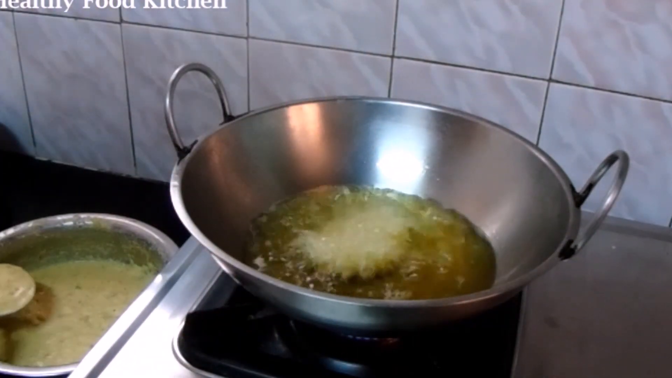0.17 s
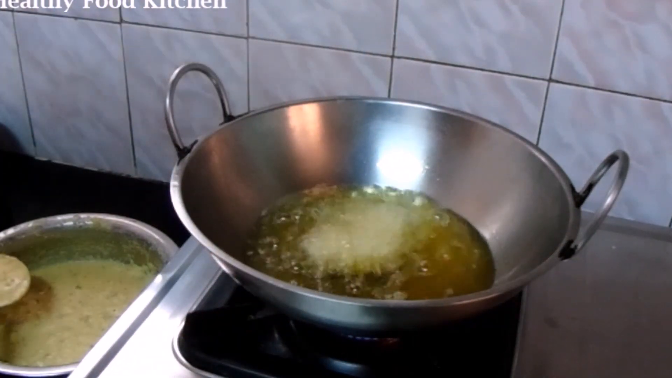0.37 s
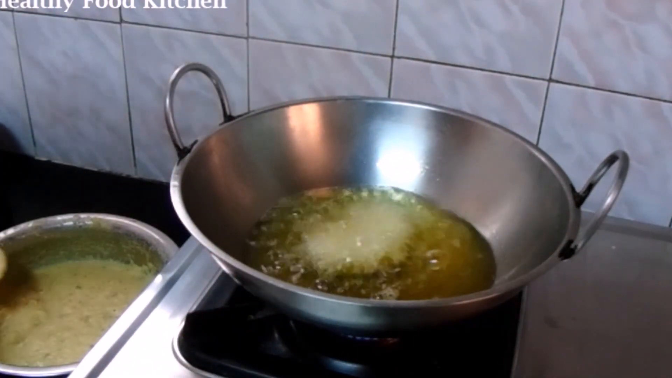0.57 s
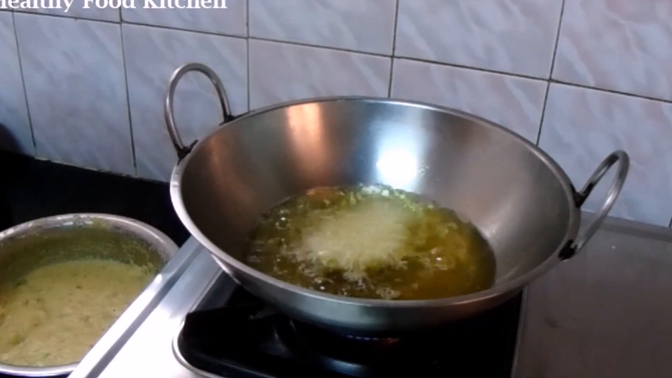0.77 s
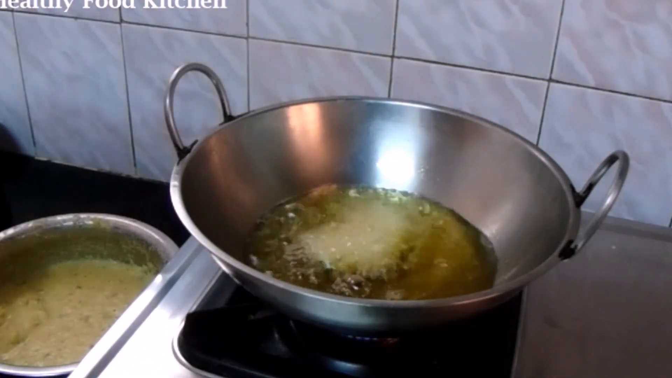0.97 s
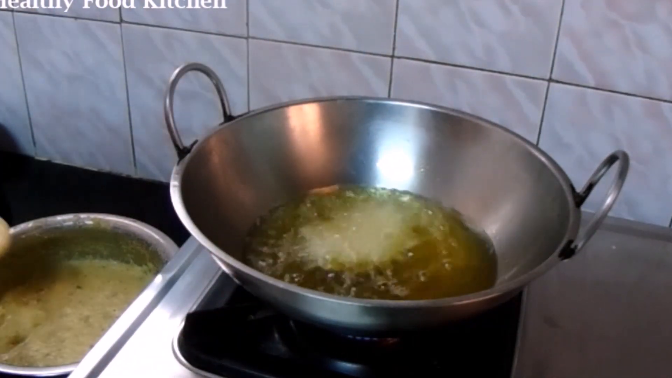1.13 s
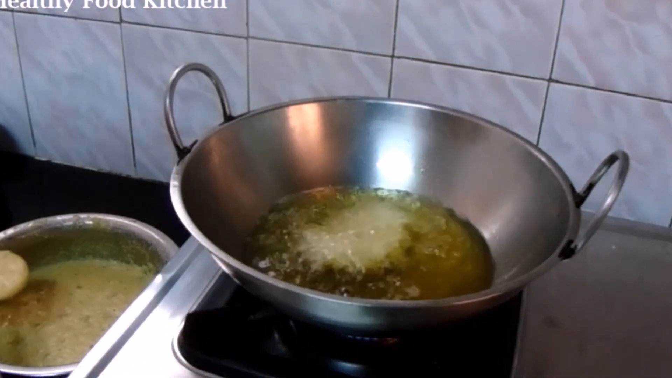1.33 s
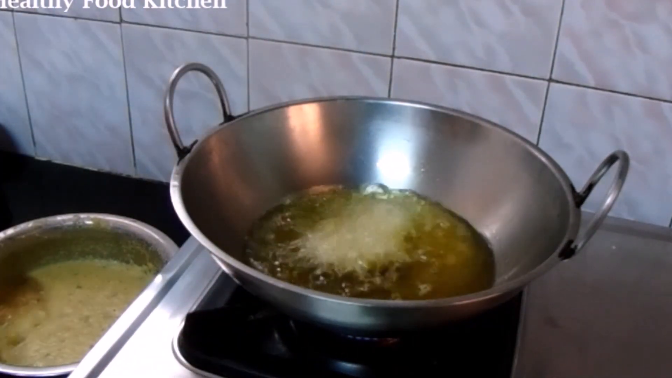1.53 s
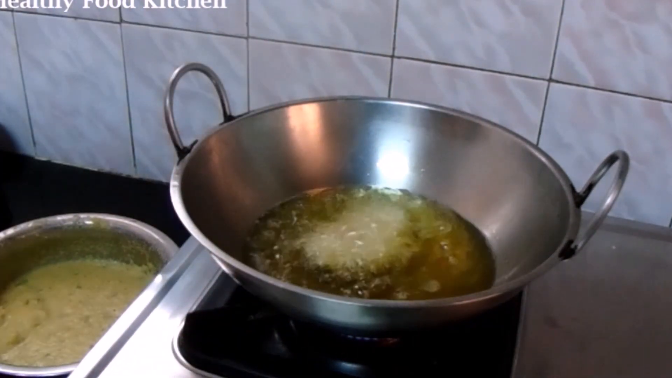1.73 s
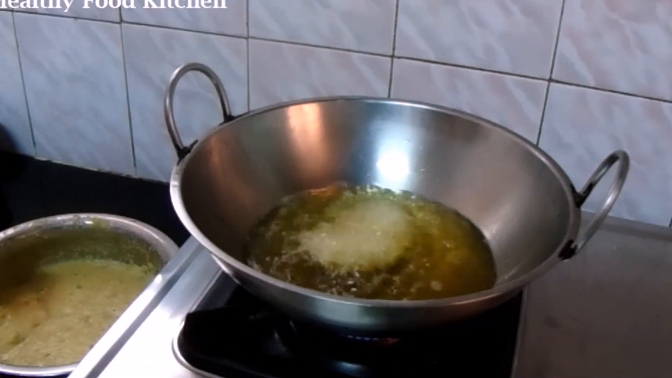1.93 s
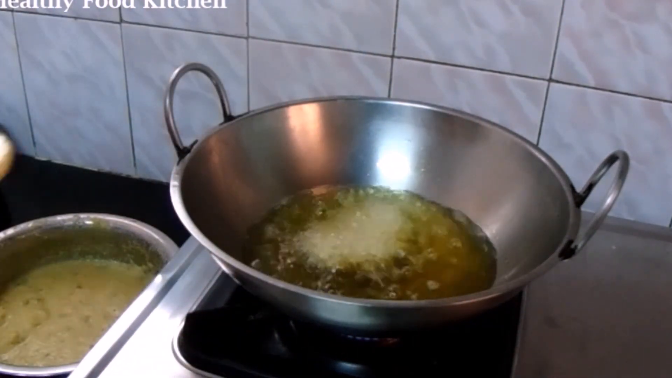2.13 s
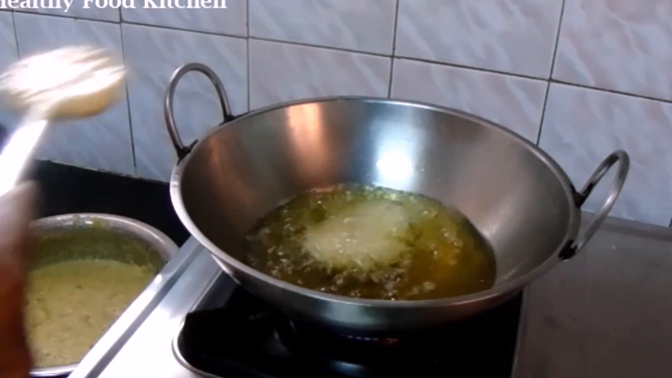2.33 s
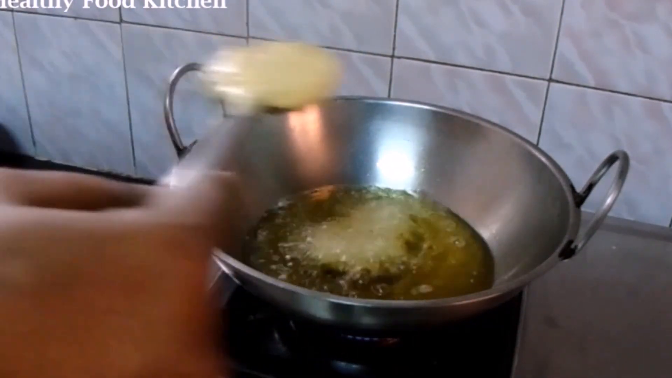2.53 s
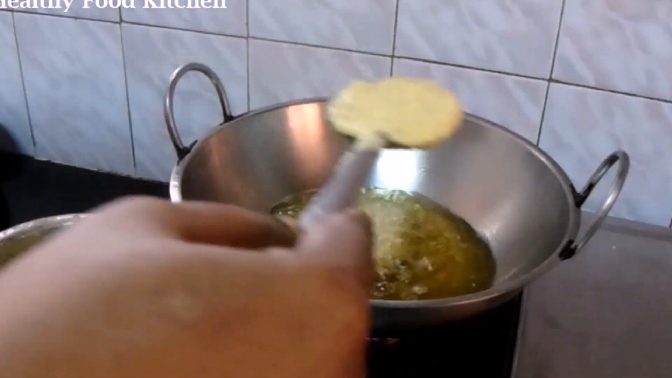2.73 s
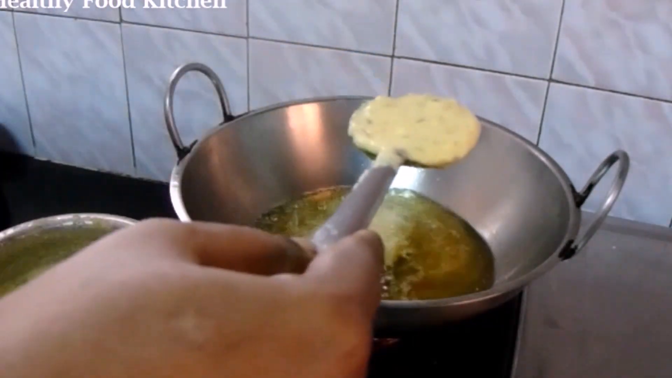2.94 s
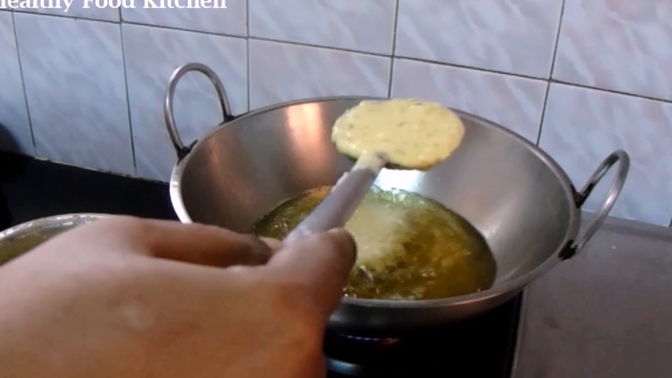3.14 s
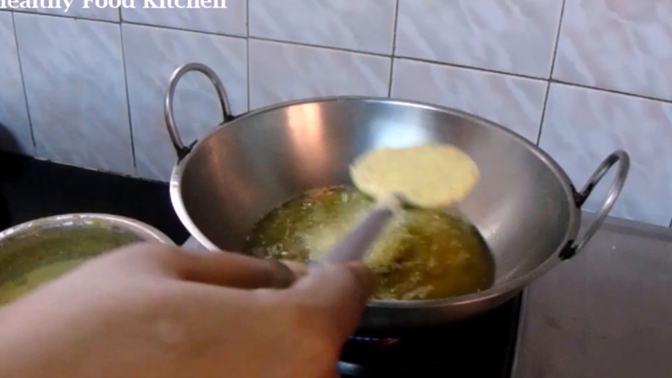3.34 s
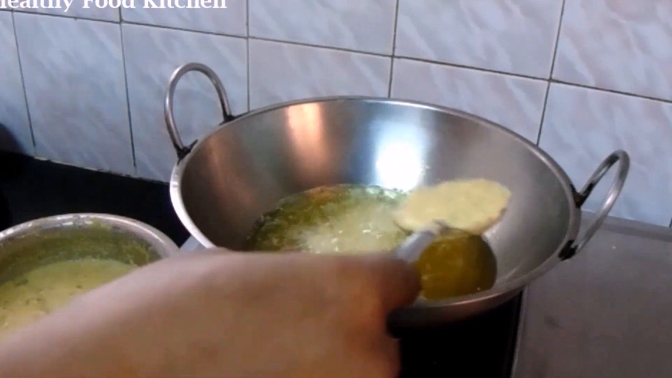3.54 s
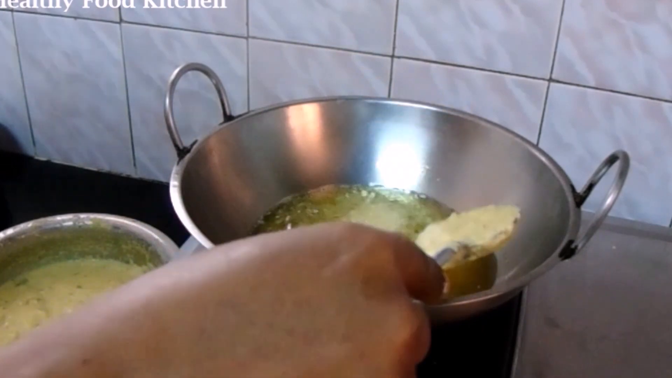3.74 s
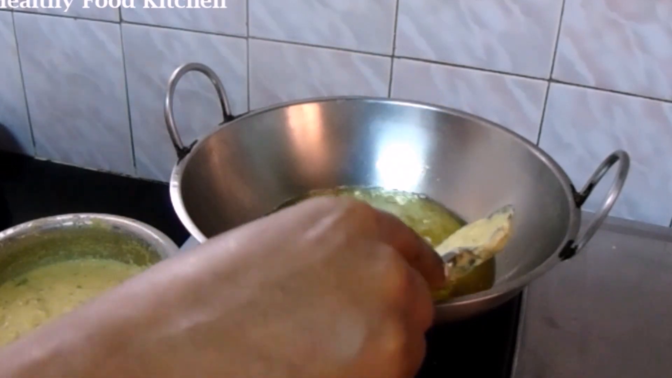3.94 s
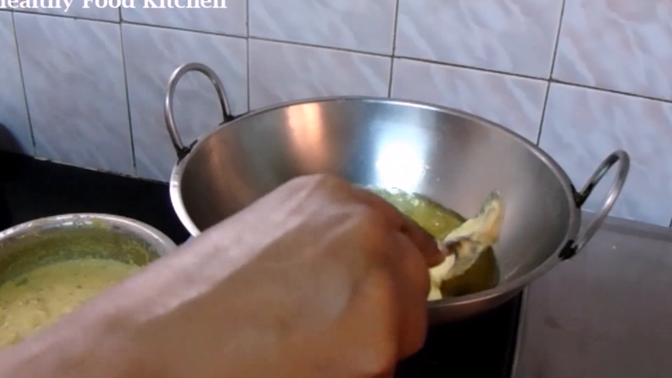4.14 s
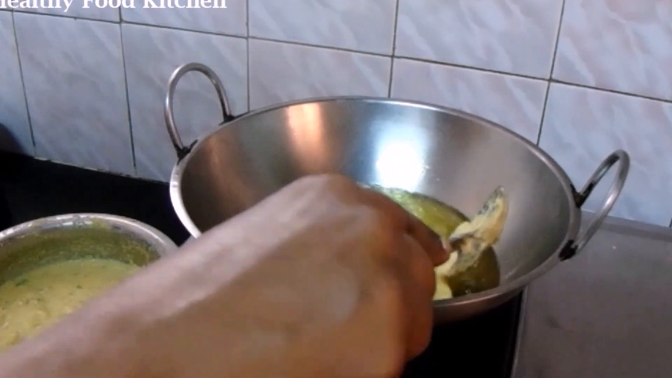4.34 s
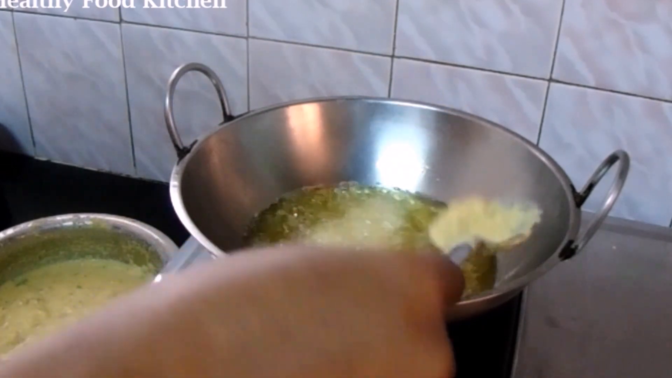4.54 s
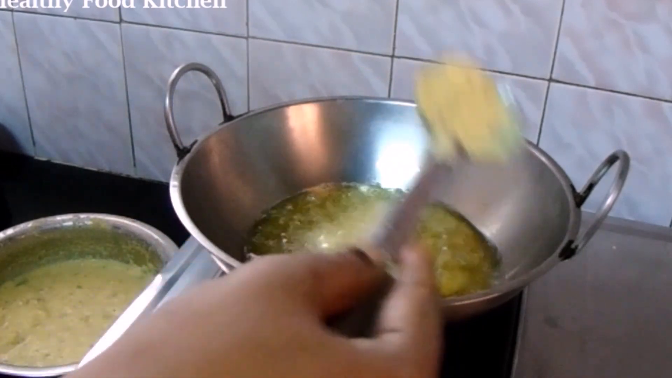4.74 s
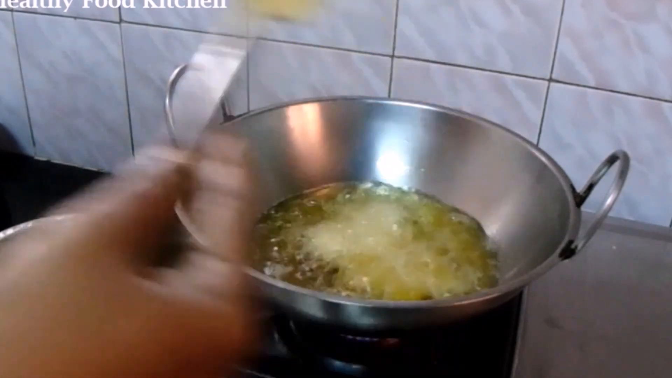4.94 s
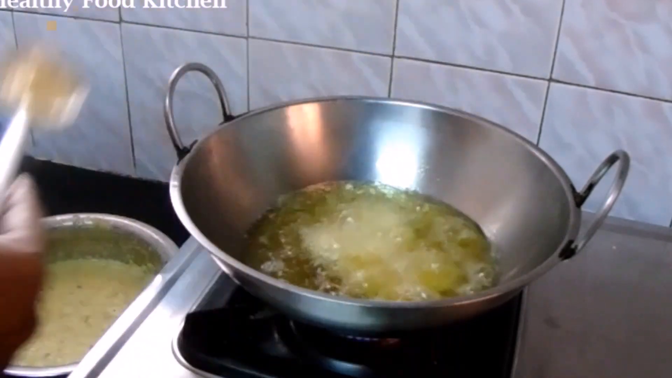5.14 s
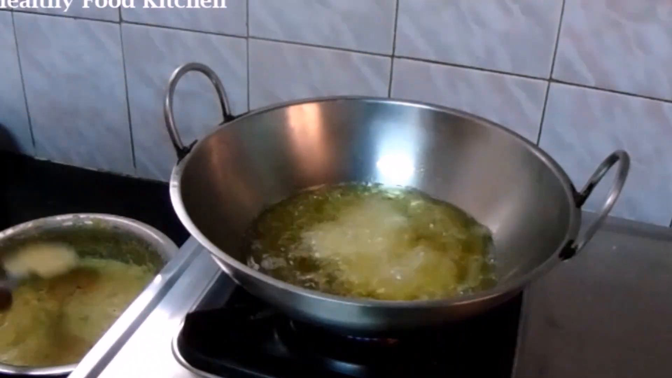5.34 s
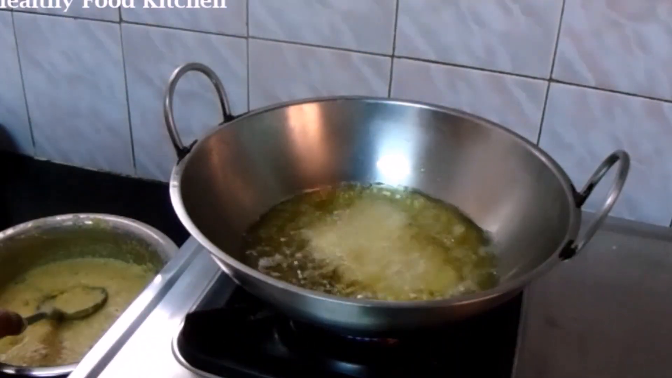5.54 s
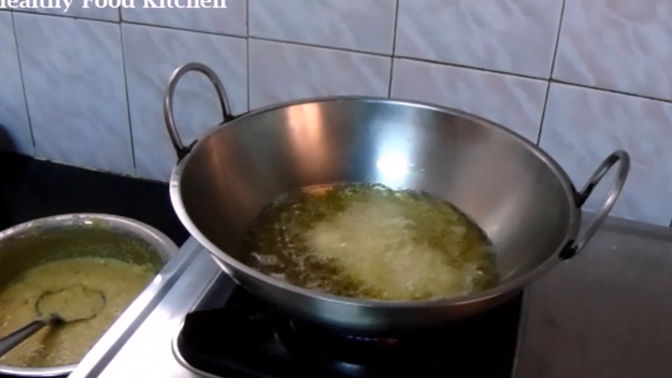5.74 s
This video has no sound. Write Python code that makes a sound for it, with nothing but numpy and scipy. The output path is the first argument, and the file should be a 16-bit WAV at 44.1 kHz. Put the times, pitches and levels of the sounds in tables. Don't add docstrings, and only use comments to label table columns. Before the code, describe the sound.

Bubbling oil hisses and crackles.

```python
import sys
import numpy as np
from scipy import signal
from scipy.fft import rfft, irfft
from scipy.io import wavfile
from scipy.ndimage import uniform_filter1d

SR = 44100
rng = np.random.default_rng(int(sys.argv[2]) if len(sys.argv) > 2 else 0)


def to_linear_factor(level_db):
    exponent = np.asarray(level_db, float) / 20
    return 10 ** exponent


def dump_mix(stems):
    frames = np.atleast_2d(stems).T
    limited = np.clip(frames, -1, 1)
    pcm = np.round(limited * 32767).astype(np.int16)
    wavfile.write(sys.argv[1], SR, pcm)


N = 260190
HOP = 941

# [f/Hz, level/dB]
HUM = [(296.1, -53.5)]


def in_time(rows):
    s, *columns = np.transpose(rows)
    return [np.interp(np.arange(N) / SR, s, column) for column in columns]


def rms_one(x):
    return x / np.sqrt(np.mean(x ** 2) + 1e-20)


def coloured(x, points):
    hz, db = np.transpose(points)
    axis = np.maximum(np.fft.rfftfreq(N, 1 / SR), 1)
    gain_db = np.interp(np.log(axis), np.log(hz), db, left=-80)
    return irfft(rfft(x) * to_linear_factor(gain_db), N)


def drift(rate):
    step = 40
    r = np.exp(-2 * np.pi * rate * step / SR)
    noise = rng.standard_normal(N // step + 2002)
    slow = signal.lfilter([1], [1, -2 * r, r * r], noise)[2000:]
    return np.interp(np.arange(N) / step, np.arange(len(slow)), rms_one(slow))


def resonance(x, hz, width):
    r = np.exp(-np.pi * width / SR)
    return signal.lfilter((1 - r * r) / 2 * np.array([1, 0, -1]), [1, -2 * r * np.cos(2 * np.pi * hz / SR), r * r], x)


def kitchen(x, wet_db):
    out = x.copy()
    for lag_s, db in [(.0068, -5.5), (.0113, -6.5), (.0187, -10.5), (.0271, -9.5), (.039, -8.5)]:
        lag = round(lag_s * SR)
        out[lag:] += to_linear_factor(db + wet_db) * x[:-lag]
    return out


def hum():
    hz, db = HUM[0]
    phase = 2 * np.pi * np.cumsum(hz + 0.915 * drift(3.5)) / SR
    return np.sqrt(2) * to_linear_factor(db + 1.8 * drift(25.0)) * np.sin(phase)


def rumble():
    # [f/Hz, level per Hz/dB]
    spectrum = [(15, 2), (30, -6), (60, 1.5), (100, -2), (200, 1), (260, 5), (340, 4), (420, 1), (600, -42)]
    return to_linear_factor(-62.5) * rms_one(coloured(rng.standard_normal(N), spectrum))


def stirred_air():
    # [t/s, peak level/dB]
    passes = [(1.02, -84), (2.27, -67), (2.78, -60), (3.3, -68), (4.8, -87), (5.8, -65)]
    still_db, fall_db_per_s = -71, 64
    t = np.arange(N) / SR
    strength = to_linear_factor(still_db) + sum(to_linear_factor(db - fall_db_per_s * abs(t - s)) for s, db in passes)
    slow_band = signal.butter(2, [10, 27], "band", fs=SR, output="sos")
    return strength * rms_one(signal.sosfilt(slow_band, rng.standard_normal(N)))


def whistles():
    # [start t/s, length/s, first f/Hz, last f/Hz, level/dB]
    calls = [
        (0.017, 0.42, 866, 884, -54.5),
        (1.201, 0.22, 518, 570, -53),
        (1.47, 0.2, 613, 617, -49.5),
        (1.907, 0.07, 460, 458, -57),
        (2.114, 0.23, 475, 468, -60),
        (4.24, 0.027, 715, 709, -55),
        (4.324, 0.15, 612, 588, -55),
        (4.491, 0.188, 565, 520, -57.5),
    ]
    fade_db_per_s = 350
    t = np.arange(N) / SR
    s, length, first_hz, last_hz, db = np.transpose(calls)
    turns_s = np.ravel([s, s + length], "F")
    hz = np.interp(t, turns_s, np.ravel([first_hz, last_hz], "F")) + 11 * drift(22.5)
    before, after = s[:, None] - t, t - (s + length)[:, None]
    outside_s = np.maximum(np.maximum(before, after), 0)
    level_db = np.max(db[:, None] - fade_db_per_s * outside_s, axis=0) + 4.5 * drift(14.0) - 2
    return np.sqrt(2) * to_linear_factor(level_db) * np.sin(2 * np.pi * np.cumsum(hz) / SR)


def bursts(events, t60, sharpness, crack_db, breadth, crack_s):
    length = 4500
    out, t = np.zeros(N + length), np.arange(length) / SR
    noise = rng.standard_normal((len(events), length))
    for (s, db, hz), puff in zip(events, noise):
        puff = puff * to_linear_factor(-60 * t / t60) * np.minimum(t / 0.0002, 1)
        crack = puff * to_linear_factor(-60 * t / crack_s)
        tone = puff
        for _ in range(2):
            crack = resonance(crack, hz, breadth * hz)
            tone = resonance(tone, hz, hz / sharpness)
        drop = tone / abs(tone).max() + to_linear_factor(crack_db) * crack / abs(crack).max()
        out[round(s * SR):][:length] += to_linear_factor(db - 2.5) * drop
    return out[:N]


def ladle_knocks():
    # [t/s, peak level/dB, f/Hz]
    knocks = [
        (3.5, -33, 770),
        (5.765, -45.5, 160),
        (5.752, -32.5, 560),
        (5.768, -28, 770),
    ]
    return bursts(knocks, 0.07, sharpness=0.81, crack_db=-3.5, breadth=0.71, crack_s=0.005)


def pops():
    # [t/s, peak level/dB, f/Hz]
    pop_list = [(0.1054, -32, 2610), (0.9694, -25.5, 2490), (0.9854, -24, 2800), (1.494, -32, 2620),
                (1.711, -32, 2700), (1.9905, -40, 3260), (2.182, -27, 1530), (2.391, -27, 4260),
                (2.541, -29.5, 1600), (2.827, -34, 3020), (2.8797, -27, 4000), (3.2072, -32, 1550),
                (4.0179, -33, 1470), (4.6405, -22.5, 4340), (4.79, -29, 2180), (4.8684, -24, 4380),
                (5.4244, -23, 2620), (5.4935, -29, 2400), (5.7154, -23, 2800), (5.7508, -22, 3800),
                (5.768, -24.5, 2960),
                (1.2211, -35, 1550), (1.5566, -37, 4310), (3.0294, -40, 2730), (3.1582, -36, 3800),
             (3.276, -36, 4260), (3.868, -32, 2280), (4.035, -32, 2660), (4.129, -26, 2240),
             (4.3934, -35, 4340), (5.6334, -35, 2200), (0.0183, -30, 4650), (0.5825, -38, 4240),
             (1.6896, -35, 2750), (2.1307, -29, 4640), (3.3283, -31, 2800), (4.782, -29, 4700),
             (4.7968, -26, 2200), (4.8436, -25, 4270), (5.3136, -31, 4550), (4.601, -26.5, 2240)]
    return bursts(pop_list, 0.029, sharpness=5.7, crack_db=2.0, breadth=1.35, crack_s=0.015)


def spits():
    # [t/s, peak level/dB, f/Hz]
    first = [(0.0175, -29.5, 9700), (0.183, -31, 11300), (.488, -42, 13000), (0.643, -33, 9900),
             (1.0251, -31, 7300), (1.255, -46, 10700), (1.6884, -35, 8480), (2.1713, -29.5, 10400),
             (2.183, -39, 9050), (2.45, -35, 13480), (2.706, -33.5, 8950), (2.9253, -32, 9200),
             (3.1028, -32.5, 8000), (3.1732, -31.5, 8100), (3.2096, -35, 11000), (3.2797, -37, 5500),
             (3.365, -35, 13100), (3.4406, -35, 8000), (3.472, -33.5, 11000), (3.5119, -37, 5670),
             (3.6182, -41, 5850), (3.8137, -41, 5730), (3.819, -33, 13300), (3.8915, -31, 5360),
             (3.9519, -46, 7200)]
    # [t/s, peak level/dB, f/Hz]
    fresh = [(4.274, -36, 5860), (4.34, -26, 10000), (4.6998, -24.5, 8530), (4.794, -23, 6900),
             (4.8417, -25, 10000), (4.86, -25, 6500), (5.0562, -37, 10700), (5.099, -36, 5490),
             (5.209, -23, 6800), (5.2658, -26.5, 8400), (5.4878, -27.5, 9100), (5.565, -29, 10300),
             (5.7597, -28, 7200), (5.8405, -26, 9600)]
    return bursts(first + fresh, 0.083, sharpness=3.6, crack_db=5.5, breadth=0.59, crack_s=0.013)


def spurts():
    # [t/s, peak level/dB, f/Hz]
    spurt_list = [
        (0.3677, -23.5, 6560),
        (5.205, -21, 8350),
        (5.2244, -24, 8700),
        (5.43, -24, 2600),
    ]
    return bursts(spurt_list, 0.09, sharpness=5.9, crack_db=-2.0, breadth=1.0, crack_s=0.014)


def ticks():
    # [t/s, peak level/dB, f/Hz]
    droplets = [(0.7088, -33, 5020), (0.784, -28.5, 9500), (0.9203, -33, 5900), (1.6152, -26, 6460),
                (1.9484, -31, 5730), (2.1414, -35, 5010), (2.372, -25, 5400), (2.7524, -32, 10100),
                (3.286, -29, 5670), (3.3273, -25, 5500), (3.5234, -27, 9820), (3.6451, -28, 10100),
                (3.7534, -24, 9160), (3.8736, -30, 5560), (3.9364, -30, 5310), (4.0098, -30, 9120),
                (4.1001, -24, 5940), (4.2663, -21.5, 5940), (5.4116, -39, 5600), (5.6296, -36, 5950)]
    return to_linear_factor(-7.0) * bursts(droplets, 0.035, sharpness=3.4, crack_db=7.5, breadth=1.0, crack_s=0.0098)


def cracks():
    # [t/s, peak level/dB, f/Hz]
    sharp = [
        (0.71, -21, 2500),
        (3.8915, -20.5, 2350),
        (0.6895, -30, 2900),
        (5.4862, -21.5, 2070),
        (1.0256, -32, 8300),
        (3.9522, -28, 9600),
    ]
    slap_s, slap_db = 0.0016, -2
    direct = bursts(sharp, 0.012, sharpness=1.15, crack_db=-2.5, breadth=1.6, crack_s=0.004)
    return direct + to_linear_factor(slap_db) * np.roll(direct, round(slap_s * SR))


def jet():
    # [t/s, level/dB]
    strength = [
        (4.02, -87),
        (4.1, -39.5),
        (4.2, -38),
        (4.38, -36),
        (4.55, -35),
        (4.85, -41),
        (5.02, -42.5),
        (5.1, -79),
    ]
    hiss = resonance(resonance(rng.standard_normal(N), 6200, 2500), 6180, 2470)
    return to_linear_factor(in_time(strength)[0] + 1.4 * drift(41.0)) * rms_one(hiss)


def grains(low, high, per_s, cycles, spread_db, clump_db, hiss_db):
    sizes = to_linear_factor(spread_db * np.minimum(rng.exponential(1, N), 5.2)) * rng.choice([-1, 1], N)
    born = rng.random(N) < per_s / SR
    dealt = rng.integers(0, 10, N)
    shared = drift(9.8)
    out = 0
    for k, hz in enumerate(np.geomspace(low, high, 21)[1::2]):
        clumps = to_linear_factor(clump_db * (0.56 * shared + drift(9.0)))
        clicks = sizes * born * (dealt == k) * clumps + 1e-18
        out = out + rms_one(resonance(clicks, hz, 2.2 * hz / cycles)) * np.sqrt(hz)
    band = signal.butter(3, [low, high], "band", fs=SR, output="sos")
    hiss = rms_one(signal.sosfilt(band, rng.standard_normal(N)))
    return rms_one(signal.sosfilt(band, out)) + to_linear_factor(hiss_db) * hiss


def wok(x):
    # [f/Hz, width/Hz, level/dB]
    peaks = [(715, 22, -8), (880, 28, -1), (983.5, 17.6, 3), (1114, 7, -3), (1450, 19, 2.5), (1530, 60, -1),
             (2210, 180, -1), (2650, 60, -2), (2741, 44, -4), (2800, 34, -2.5), (2895, 24, -5),
             (3203, 18, 2.5), (3526, 55, -3), (4260, 8.4, 3.5), (4527, 28, -2.5), (4660, 74, -6.5),
             (6200, 360, -8.5)]
    return x + sum(to_linear_factor(db) * resonance(x, hz, width) for hz, width, db in peaks)


def sizzle():
    # [f/Hz, level per Hz/dB]
    oil = [(200, -58), (340, -16.5), (597, -7), (767, -8), (856, -5), (1170, -7), (1500, -2.5),
           (1840, -3.5), (2220, -3.5), (5170, -0.5), (6140, -2), (10300, -6), (14400, -18)]
    edges = [340, 1800, 5200, 8500, 11300, 15000]
    # [t/s, vigour/dB, spatter (how much finer the bubbles are)/dB]
    boil = [(0, -38.5, -3), (.3, -39, -11), (.7, -38.5, -6), (1.3, -40, -8.5), (2.05, -39, -6.5),
            (2.6, -40, -4.5), (3.3, -40.5, -5.5), (3.8, -43, -3.5), (4.06, -38.5, -5.5), (4.3, -36.5, 2),
            (4.5, -33.5, 1), (4.72, -34.5, 1), (4.88, -36.5, 2.5), (5.02, -36, -3), (5.2, -35.5, 1),
            (5.5, -34, -8), (5.74, -33, -1), (5.9, -34.5, -1)]
    # [level over resting vigour/dB, share of vigour's swing, share of spatter's swing]
    mix = [
        (-5.5, 0.49, 0.0056),
        (-0.88, 1.034, 0.015),
        (-6, 0.84, 0.34),
        (-10.5, 0.69, 1),
        (-20, 1.2, 1),
    ]
    rest_db, rest_spatter_db = -40.5, -7
    low, high = edges[:-1], edges[1:]
    gurgle = grains(low[0], high[0], per_s=900, cycles=14, spread_db=2.0, clump_db=2.5, hiss_db=0.6)
    bubbles = grains(low[1], high[1], per_s=4000, cycles=10.5, spread_db=3.0, clump_db=2.0, hiss_db=-3.5)
    fizz = grains(low[2], high[2], per_s=5000, cycles=7.4, spread_db=3.0, clump_db=3.0, hiss_db=4.5)
    spray = grains(low[3], high[3], per_s=6300, cycles=3.5, spread_db=1.5, clump_db=7.5, hiss_db=-4.0)
    mist = grains(low[4], high[4], per_s=3700, cycles=5.3, spread_db=-1.0, clump_db=-8.0, hiss_db=3.0)
    vigour_db, spatter_db = in_time(boil)
    out = 0
    for (db, share, fine), x in zip(mix, (gurgle, bubbles, fizz, spray, mist)):
        swing_db = share * (vigour_db - rest_db) + fine * (spatter_db - rest_spatter_db)
        out = out + to_linear_factor(rest_db + db + swing_db) * rms_one(wok(coloured(x, oil)))
    return out


def scene():
    background = hum() + rumble() + stirred_air() + whistles()
    low_drops = kitchen(pops() + ladle_knocks() + cracks(), wet_db=-4.0)
    high_drops = kitchen(spits() + spurts() + ticks(), wet_db=-2.5)
    return (background + low_drops + high_drops + jet() + sizzle())[None]


def strongest(spectrum, size, lines, db):
    height = size / uniform_filter1d(size, size=61) ** .97
    tops = signal.find_peaks(height, distance=5)[0]
    tops = tops[np.argsort(-height[tops])][:max(int(lines), 0)]
    kept = np.zeros_like(spectrum)
    kept[tops] = size[tops] * np.sign(spectrum[tops])
    boost = to_linear_factor(db) * np.sqrt(np.sum(spectrum ** 2) / (np.sum(kept ** 2) + 1e-20))
    return kept * min(boost, 2.9)


def thin_moments():
    # [t/s, low lines kept, level/dB]
    top_without_chance = [(0.351, 11.5, 7.5), (0.456, 15, 2.5), (0.543, 15.5, 7.5), (0.619, 12.6, 7.5),
                          (0.971, 28, 8), (0.992, 13, 4.5), (1.118, 7, 7), (1.292, 10, -3), (1.674, 5.7, 0),
                          (1.738, 9.4, 7), (1.782, 5.3, 0), (1.802, 16, 6.5), (2.062, 11, -2), (2.314, 10, 5.5),
                          (2.689, 8.8, 4), (2.785, 19, 7), (2.976, 9.4, 4.5), (3.007, 11, 1.5), (3.552, 10, 6),
                          (3.592, 5.9, 1), (3.927, 8.6, 3), (4.151, 10.6, 8.5), (4.361, 4.5, -14), (4.984, 8.1, 4.5),
                          (5.045, 5.1, -2), (5.399, 6.3, 3.5), (5.813, 6.8, 2.5)]
    # [t/s, low lines kept, level/dB]
    top_faint = [(0.394, 12, 7), (0.521, 9.6, 6.5), (0.842, 12, 4), (0.883, 6.4, 2.5), (0.906, 6.7, 0),
                 (1.331, 8, 7), (1.547, 4.3, -8), (1.93, 13, 8), (2.41, 14, 7.5), (2.464, 6.1, 2.5),
                 (3.234, 4.4, 0), (3.252, 10, 5), (3.404, 11, 1.5), (3.745, 4.3, -3), (4.312, 9, 5),
                 (4.959, 5.1, -6), (5.024, 9, 7), (5.088, 5, -4), (5.656, 11.3, 4.5)]
    # [t/s, low lines kept, level/dB]
    top_strong = [(0.429, 9.9, 7.5), (0.757, 5.8, 2), (1.16, 8.6, 4), (2.016, 14, 7.5), (3.123, 5.9, 4),
                  (3.424, 6.4, 3), (3.657, 10.3, 7), (3.786, 10.8, 3.5), (4.17, 4.4, 1), (4.232, 5.9, -1.5),
                  (4.254, 7.8, 1.5), (4.381, 4.5, -12), (5.172, 9, 5.5), (5.333, 12, 8.5), (5.47, 8.1, 2.5),
                  (5.557, 7.2, 2.5), (5.621, 4.9, -8)]
    linked_s = np.array([.544, .992, 1.802, 4.17, 4.381])
    moments = [(*row, 0, 0) for row in top_without_chance]
    moments += [(*row, 1.5, -15) for row in top_faint]
    moments += [(*row, 1.5, -11) for row in top_strong]
    moments = sorted(moments)
    starts = [round(row[0] * SR) - HOP for row in moments]
    for k in range(1, len(starts)):
        if abs(linked_s - moments[k][0]).min() < .004:
            starts[k] = starts[k - 1] + HOP
        else:
            starts[k] = max(starts[k], starts[k - 1] + HOP + 40)
    return moments, starts


def moment_windows(moments):
    abrupt_end_s = np.array([.62, 1.291, 2.062, 3.404, 3.551, 3.786])
    n = np.arange(2 * HOP) + .5
    smooth = np.sin(np.pi * n / (2 * HOP))
    fall = np.cos(np.pi / 2 * np.clip((n / HOP - 23 / 16) * 8, 0, 1))
    abrupt = np.where(n < HOP, smooth, fall)
    return np.array([abrupt if abs(abrupt_end_s - row[0]).min() < .004 else smooth for row in moments])


def line_of(hz):
    return (np.asarray(hz) * 2 * HOP / SR).astype(int)


def hold_tones(kept, lines, s, typical):
    # [t/s, f/Hz, f/Hz, f/Hz, f/Hz]
    held_four = [(0.351, 1480, 4260, 3820, 2400), (0.393, 2640, 6360, 6760, 6140),
                 (0.429, 3300, 4570, 2750, 4240), (0.456, 4540, 4720, 1600, 4360),
                 (0.522, 3900, 3300, 6200, 2830), (0.543, 1470, 4570, 3950, 3520),
                 (0.62, 4960, 4630, 1454, 950), (0.757, 3380, 1620, 2380, 5470),
                 (0.842, 3360, 2800, 3880, 4400), (0.884, 2430, 2700, 3300, 3530),
                 (0.906, 2780, 1514, 4080, 2230), (0.971, 2570, 2240, 1620, 1110),
                 (0.992, 2720, 2600, 1500, 3000), (1.122, 1475, 2910, 2150, 3760),
                 (1.16, 1453, 4770, 3190, 2810), (1.291, 2900, 2180, 880, 3680),
                 (1.312, 580, 2720, 2340, 3760), (1.333, 1530, 4950, 2560, 3830),
                 (1.549, 620, 2550, 2210, 2720), (1.674, 1530, 2720, 970, 2190),
                 (1.738, 1450, 2800, 2590, 4250), (1.782, 2680, 6600, 6340, 4330),
                 (1.802, 3260, 2990, 3830, 1580), (1.93, 2800, 3750, 3200, 2030),
                 (2.016, 2640, 2260, 3330, 5000), (2.062, 5860, 4100, 1610, 4600),
                 (2.313, 3750, 1940, 2320, 2890), (2.412, 2210, 3430, 2800, 3300),
                 (2.466, 2790, 2180, 3550, 2910), (2.689, 1540, 720, 4580, 5400),
                 (2.785, 3450, 3820, 1460, 4190), (2.976, 2780, 4300, 1480, 2270),
                 (3.008, 2900, 2640, 4530, 860),
                 (3.125, 1490, 3360, 4200, 3000), (3.234, 2380, 3470, 4270, 4550),
                 (3.252, 900, 2110, 4270, 3460), (3.404, 3460, 2790, 970, 4820),
                 (3.424, 3190, 4690, 2740, 2980), (3.551, 2800, 3140, 2060, 3670),
                 (3.591, 2750, 6060, 3170, 4840), (3.657, 4880, 4600, 2980, 2800),
                 (3.74, 1810, 2220, 3060, 2800), (3.786, 2220, 3020, 4900, 4600),
                 (3.927, 3400, 2500, 3100, 2670), (4.15, 2096, 2870, 5920, 6300),
                 (4.17, 6060, 6650, 6300, 4750), (4.235, 5990, 6500, 2870, 6200),
                 (4.256, 6500, 2590, 3380, 710), (4.311, 6160, 2310, 5900, 6540),
                 (4.361, 2110, 6300, 5710, 6180), (4.381, 6360, 6000, 2044, 5470),
                 (4.957, 3930, 4380, 4860, 3040), (4.983, 6130, 5440, 3380, 850),
                 (5.027, 2680, 2240, 3930, 3640), (5.045, 2210, 4530, 2780, 986),
                 (5.088, 3690, 2140, 2780, 4800), (5.172, 3500, 6140, 4260, 2640),
                 (5.333, 2230, 2090, 6070, 4820), (5.4, 4240, 4660, 2800, 2160),
                 (5.47, 3650, 4250, 6030, 1560), (5.557, 3260, 2950, 3800, 2650),
                 (5.621, 3500, 4820, 4260, 2300), (5.656, 2700, 2940, 2150, 5840),
                 (5.813, 2960, 3830, 2820, 4580)]
    held_db = [3.5, 2.3, 0.91, 0.79]
    # [t/s, f/Hz, f/Hz, level over a typical line/dB]
    held_further = [(0.456, 8220, 8220, 8), (0.757, 8450, 8450, -2), (0.884, 8870, 8870, -5),
                    (0.906, 7460, 7420, -4), (1.122, 9570, 9570, -7), (1.16, 8420, 8420, -1),
                    (1.291, 7000, 7000, 1), (1.312, 6990, 6990, -6), (1.333, 8820, 8820, -9),
                    (1.549, 9120, 8730, 0), (2.016, 7960, 11160, -5), (2.062, 6950, 7380, -18),
                    (2.313, 6950, 6950, 0), (2.466, 7800, 7730, -8), (2.689, 7770, 7770, -1),
                    (2.785, 8730, 8730, -1), (2.976, 9180, 9410, 0), (3.008, 13330, 8840, -10),
                    (3.125, 9610, 8110, -4), (3.234, 10490, 10960, -6), (3.252, 10910, 10910, -10),
                    (3.404, 7210, 8360, -7), (3.424, 8300, 8300, -7), (3.657, 10200, 8790, 3),
                    (3.74, 10800, 10650, -6), (3.786, 8140, 7250, 2), (4.15, 7280, 7280, -2),
                    (4.17, 8500, 8520, -5), (4.235, 9400, 8500, 5), (4.256, 6910, 8500, 2),
                    (4.311, 7100, 8690, -4), (4.361, 10300, 10350, -3), (4.381, 9400, 10520, -7),
                    (4.957, 11100, 11100, 0), (5.045, 12940, 9820, -14), (5.088, 10600, 13840, -4),
                    (5.172, 7720, 13090, -1), (5.333, 8730, 8500, -6), (5.47, 7630, 8820, 3.5),
                    (5.557, 7480, 10230, 2), (5.621, 8940, 8840, 2), (5.656, 10540, 10930, -3),
                    (5.813, 7240, 7240, 7),
                    (1.291, 575, 1300, 0), (4.361, 610, 3900, -6), (4.381, 605, 1580, -9.5),
                 (3.551, 5650, 4680, -6), (0.971, 4600, 3500, -5)]
    held = np.array(held_four)
    tones = line_of(held[abs(held[:, 0] - s).argmin(), 1:])
    kept[tones] = to_linear_factor(held_db) * typical * np.sign(lines[tones])
    for at_s, *hz, db in held_further:
        if abs(at_s - s) < .006:
            tones = line_of(hz)
            kept[tones] = to_linear_factor(db) * typical * np.sign(lines[tones])


def thin_out(x):
    # [t/s, level/dB]
    leaks = [(.522, -50), (.543, -40), (.971, -17), (.992, -26), (1.291, -19), (2.062, -22), (3.404, -21.5),
             (3.551, -21), (3.786, -18), (4.361, -34), (4.381, -30.5)]
    moments, starts = thin_moments()
    windows = moment_windows(moments)
    n = np.arange(2 * HOP) + .5
    basis = np.cos(np.pi / HOP * np.outer(n + HOP / 2, n[:640]))
    hum_line, low, split = line_of([HUM[0][0], 850, 6900])
    full = np.array([x[at:at + 2 * HOP] for at in starts]) * windows @ basis
    sizes = abs(full)
    for k in np.flatnonzero(np.diff(starts) == HOP):
        sizes[k:k + 2] = sizes[k:k + 2].max(axis=0)
    thin = to_linear_factor(-60) * full
    for s, db in leaks:
        k = np.argmin([abs(row[0] - s) for row in moments])
        thin[k] = to_linear_factor(db) * full[k]
    thin[:, :hum_line - 1] = to_linear_factor(-40) * full[:, :hum_line - 1]
    around_hum = slice(hum_line - 1, hum_line + 2)
    thin[:, around_hum] = full[:, around_hum]
    for kept, lines, size, (s, low_lines, low_db, high_lines, high_db) in zip(thin, full, sizes, moments):
        kept[low:split] += strongest(lines[low:split], size[low:split], max(low_lines - 3, 1), low_db - 9.5)
        kept[split:] += strongest(lines[split:], size[split:], high_lines, high_db)
        typical = abs(kept[low:split]).sum() / max(int(low_lines - 3), 1)
        hold_tones(kept, lines, s, typical)
    out = x.copy()
    for at, change in zip(starts, (thin - full) @ basis.T * windows * 2 / HOP):
        out[at:at + 2 * HOP] += change
    return out


def low_pass(x):
    return signal.sosfilt(signal.butter(12, 14720, fs=SR, output="sos"), x)


def record(dry):
    top_cut = signal.cheby2(20, 75, 14610, fs=SR, output="sos")
    mix = signal.sosfilt(top_cut, thin_out(dry[0]))[None]
    return low_pass(mix)


dry = scene()
out = record(dry)
dump_mix(out)
```